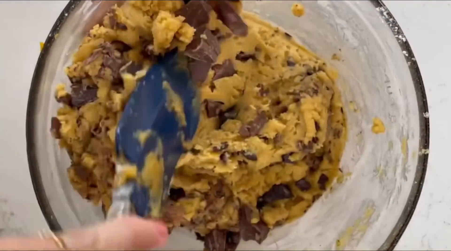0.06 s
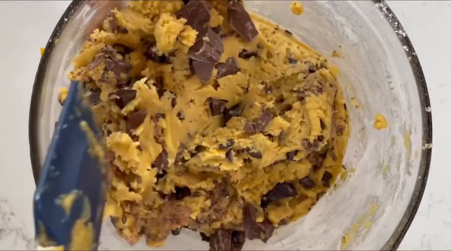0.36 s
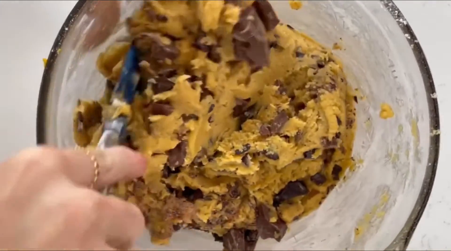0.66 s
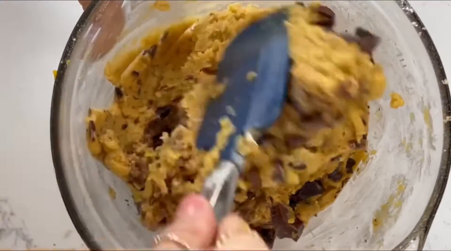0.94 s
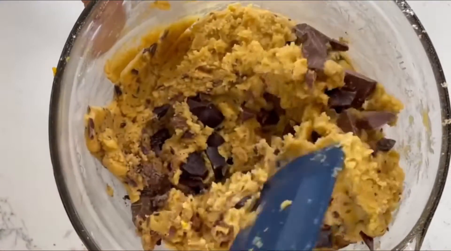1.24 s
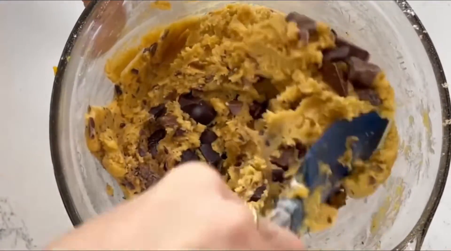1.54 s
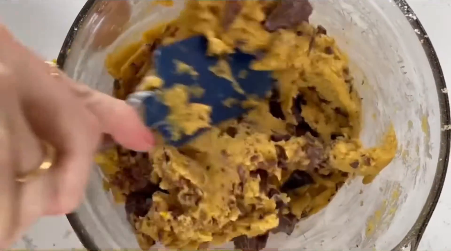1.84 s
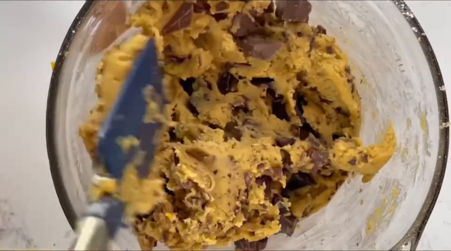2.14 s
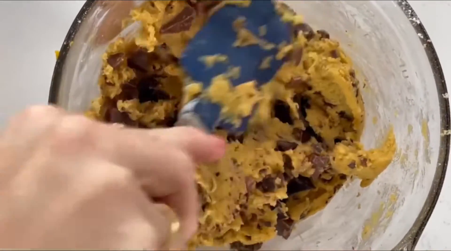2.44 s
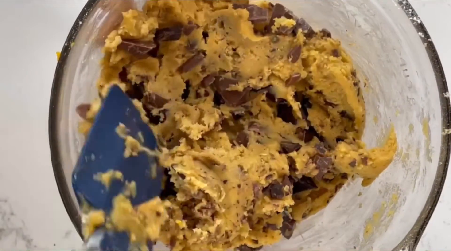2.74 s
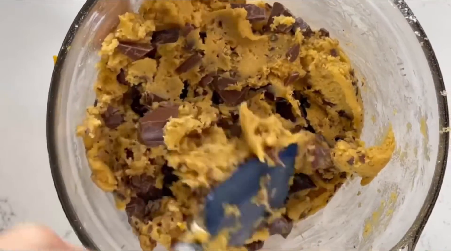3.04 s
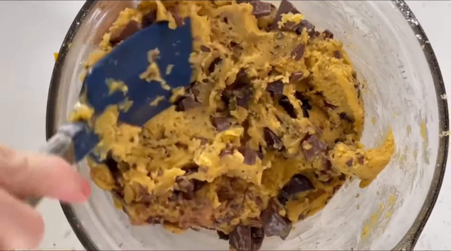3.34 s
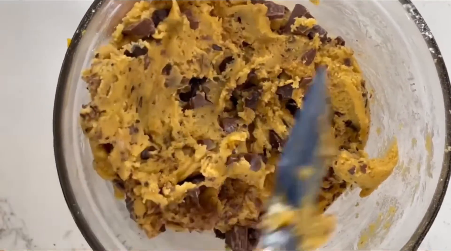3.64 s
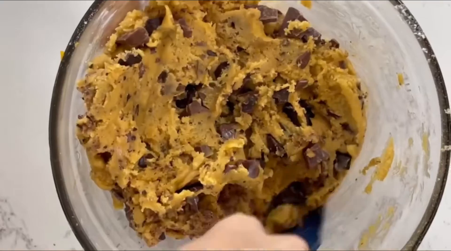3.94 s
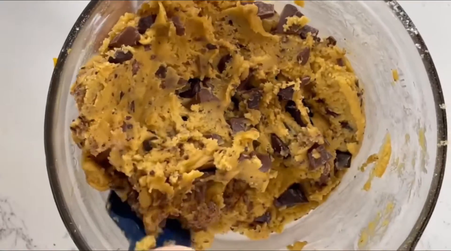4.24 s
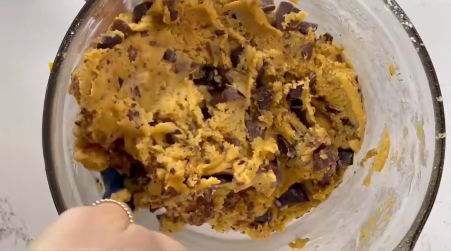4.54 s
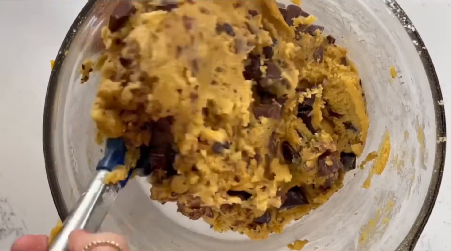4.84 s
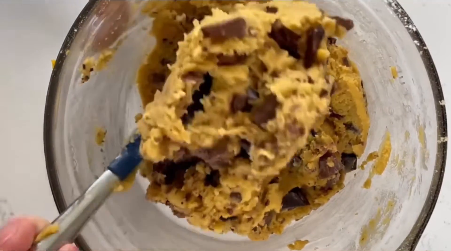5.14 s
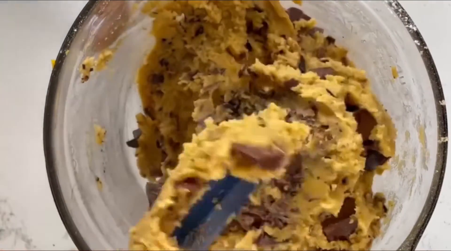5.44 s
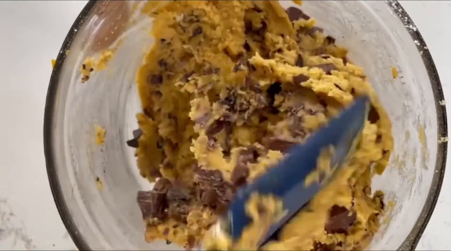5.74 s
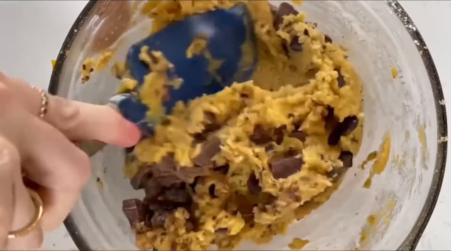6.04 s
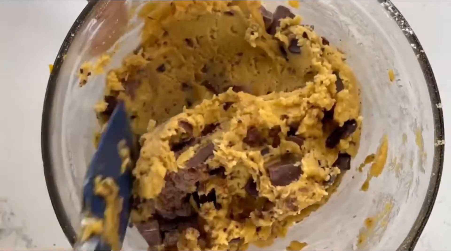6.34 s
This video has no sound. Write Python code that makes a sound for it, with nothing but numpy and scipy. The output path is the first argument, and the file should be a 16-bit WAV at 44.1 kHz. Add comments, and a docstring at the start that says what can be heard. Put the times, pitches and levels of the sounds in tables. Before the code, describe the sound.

A spatula folds sticky, chunky dough in a glass bowl, with soft squishing, scraping and a few sharp knocks.

```python
"""A silicone spatula folds sticky cookie dough with chocolate chunks in a glass bowl, close up.
From the start, stroke by stroke, the dough fizzes as it tears, the blade rubs and chunks tick.
The bowl is knocked against the counter and by the handle: mostly lightly, hard at 3 s and 4.1 s.
From 4.2 to 5 s a deep scoop shifts the bowl and the blade judders on the glass.
The loudest blow comes at 6.1 s. A live kitchen with a low hum rings behind it throughout."""
import sys
import numpy as np
from scipy import signal
from scipy.fft import rfft, irfft
from scipy.io import wavfile
from scipy.ndimage import uniform_filter1d

SR = 44100
rng = np.random.default_rng(int(sys.argv[2]) if len(sys.argv) > 2 else 0)


def master(y):
    """Save y as 16-bit WAV."""
    cut = np.clip(np.atleast_2d(y).T, -1, 1)
    pcm = np.round(cut * 32767)  # scale
    wavfile.write(sys.argv[1], SR, pcm.astype(np.int16))


N = 290619
TIME_S, FREQS_HZ = np.arange(N) / SR, np.fft.rfftfreq(N, 1 / SR)

# spatula pushes: t/s, rise/s, hold/s, fade t60/s, relative tearing level/dB, relative rubbing level/dB
STROKES = [(0.0, 0.0015, 0.061, 0.41, -66, -65), (0.363, 0.032, 0.28, 0.94, -61.5, -62),
           (0.672, 0.089, 0.31, 0.57, -61, -71), (0.757, 0.026, 0.076, 0.76, -61.5, -73),
           (0.964, 0.049, 0.056, 0.33, -69, -79), (1.138, 0.069, 0.047, 0.15, -67, -91),
           (1.38, 0.086, 0.035, 0.83, -62.5, -62), (1.558, 0.093, 0.25, 0.62, -64, -64),
           (1.672, 0.026, 0.09, 0.73, -62.5, -70), (1.92, 0.062, 0.064, 0.56, -66.5, -66.5),
           (2.314, 0.032, 0.011, 0.19, -62, -63), (2.358, 0.089, 0.13, 0.54, -63.5, -65),
           (2.592, 0.05, 0.046, 0.47, -64.5, -79), (2.786, 0.061, 0.03, 0.2, -73.5, -100),
           (2.937, 0.016, 0.16, 0.64, -69.5, -67), (3.06, 0.091, 0.046, 0.74, -62.5, -63.5),
           (3.247, 0.096, 0.1, 0.31, -64.5, -74), (3.671, 0.016, 0.4, 0.44, -63.5, -55.5),
           (3.677, 0.01, 0.022, 0.19, -60, -73), (4.126, 0.055, 0.38, 0.44, -67.5, -62),
           (4.456, 0.24, 0.6, 0.8, -63.5, -66.5), (5.555, 0.39, 0.32, 0.43, -62.5, -64),
           (6.523, 0.072, 0.024, 0.52, -75.5, -87)]
# last strands letting go of the blade: t/s, relative level/dB
STRANDS, STRAND_T60_S = [(1.335, -75), (2.923, -64), (5.627, -60), (5.654, -62)], 0.026
# small air pockets in the dough: f/Hz, width/Hz, level/dB re rubbing
POCKETS = [(1710, 400, -16), (2640, 220, -10), (3900, 250, -16)]
# wet dough squishes and a chunk scrape: t/s, length/s, level/dB, first f/Hz, last f/Hz, width/Hz
GLIDING_CRACKLES = [(0.40, 0.21, -63.5, 3100, 2600, 900), (0.518, 0.1, -62, 2000, 1600, 700),
                    (0.53, 0.14, -62, 6800, 5700, 2200), (0.762, 0.057, -59.5, 3400, 4100, 1200),
                    (0.89, 0.07, -74, 3300, 4300, 1200), (0.96, 0.098, -60, 7300, 6000, 2000),
                    (1.452, 0.074, -65, 3500, 3900, 1100), (1.57, 0.041, -57.5, 745, 610, 500),
                    (1.68, 0.1, -64, 7600, 5470, 1500), (1.784, 0.075, -61, 1900, 1430, 1000),
                    (1.787, 0.07, -63.5, 4900, 4000, 1400), (2.477, 0.079, -65, 3100, 2400, 1200),
                    (3.684, 0.039, -57, 3500, 4860, 1200), (3.76, 0.046, -61, 3980, 3670, 800),
                    (3.783, 0.14, -62, 2700, 2300, 900), (3.947, 0.091, -58, 2420, 3200, 1200),
                    (4.932, 0.11, -59, 2080, 2270, 900), (4.95, 0.076, -56, 6260, 7200, 2450),
                    (5.837, 0.15, -70, 2800, 3200, 1400)]
# bowl shifting on the counter: t/s, rise/s, hold/s, fade t60/s, relative level/dB
SHOVES = [(4.237, 0.011, 0.13, 0.3, -53), (4.434, 0.09, 0.025, 0.71, -53),
          (4.828, 0.021, 0.04, 0.19, -59.5)]
# blade stick-slip: start/s, end/s, level/dB, first rate/Hz, last rate/Hz, high corner/Hz, tuning/ratio
JUDDERS = [(2.94, 2.966, -41.5, 480, 350, 1400, 1.25), (4.451, 4.487, -51, 144, 120, 6500, 1.08),
           (4.488, 4.508, -56, 144, 136, 3500, 1.5), (4.503, 4.567, -46.5, 122, 213, 5450, 1.04),
           (4.537, 4.574, -44.5, 192, 170, 800, 0.93), (4.589, 4.622, -44.5, 168, 175, 1710, 1.06),
           (4.655, 4.68, -56, 170, 133, 1400, 1.04), (4.795, 4.852, -51, 146, 154, 1010, 1.07),
           (4.834, 4.871, -51, 152, 152, 790, 0.93), (4.95, 4.994, -53.5, 250, 227, 1970, 1.39)]
# blows on the bowl: t/s, level/dB, low corner/Hz, high corner/Hz, ping f/Hz,
# then relative to the blow: ping/dB, blade/dB, thump/dB, clack/dB, crack/dB, room feed/dB
BLOWS = [(0.020, -48, 550, 3600, 660, -20, 2, -23, -26, -4, -3),
         (0.381, -33.5, 3600, 6460, 4470, -6, -14.5, -32, -35, -2, -15),
         (0.690, -38, 700, 2800, 1900, -8, -8, -15, -23, -3, -12),
         (0.709, -40.5, 2000, 4000, 3200, -18, -13, -17, -23, -8, -13),
         (0.792, -46.5, 2480, 6000, 3520, -12, -25, -31, -30, 5, 4),
         (0.877, -45.5, 1200, 3000, 1530, -1, -13, -25, -28, 1, -5),
         (1.095, -44.5, 700, 2700, 1534, 0, -2, -28, -30, -2, -11.5),
         (1.517, -52, 700, 1300, 890, -8, -2, -25, -20, 6, -10),
         (1.73, -53, 1200, 3400, 1700, -6, -22, -25, -25, 2, -12),
         (1.887, -40, 650, 1260, 824, -4, -1, -29, -12, -7, -9),
         (1.972, -54, 650, 1300, 870, 2, -4, -25, -20, -7, -3),
         (2.335, -50.5, 1900, 7000, 5770, -16, 5, -30, -25, -4, -15),
         (2.353, -40, 700, 2640, 2280, -10, -5.5, -26, -3.5, 5, -14),
         (2.547, -50, 1210, 4500, 1660, -8, -18, -31, -22, -5, -15),
         (2.960, -12, 310, 940, 1130, -8, -12.5, -7.5, -2, -2.5, -5),
         (2.961, -34, 3600, 6540, 4400, -6, -25, -34, -30, 2, -12),
         (2.9649, -20, 200, 520, 378, -0.5, -7, -11, -15, -0.5, -9),
         (3.678, -41.5, 600, 5200, 1740, -8, 4, -9, -18, 7, -23),
         (3.821, -40.5, 1530, 2680, 2320, -3.5, -20, -27.5, -19, -3, -17),
         (3.873, -43, 1500, 3000, 2370, -7, -15, -30, -24, -9, -10),
         (3.976, -45.5, 650, 2200, 960, -9, -3, -20, -9, -1, 4.5),
         (4.027, -39, 2500, 3800, 3500, -17, -7, -27, -23, -4, -21),
         (4.068, -15, 1600, 3900, 4420, -15.5, -18.5, -28, -22.5, -19, -13),
         (4.088, -38, 600, 2490, 540, -1, -5, -23.5, -4, -3, 2.5),
         (4.262, -35, 500, 1900, 1800, -1, -6, 7.5, -5, -10, -5.5),
         (4.267, -41, 220, 500, 245, 5, -17, -2, -17, -10, 6),
         (4.659, -49.5, 600, 1380, 1040, -3.5, 6, -8, -8, -8, -14),
         (4.728, -43.5, 553, 1167, 646, -12.5, 5.5, -9, -25, -20, -2),
         (4.867, -43, 1310, 2700, 1650, -14, -16, -20, -26, 2, -4),
         (4.916, -33.5, 1900, 5600, 2300, -5.5, -13.5, -31, -24, 4.5, -11.5),
         (4.918, -37, 3500, 6500, 3950, 1, -25, -31, -27, 1, -17),
         (4.984, -35.5, 4520, 7540, 5800, -12, -6, -24, -9, -6, -8),
         (4.9888, -34, 5300, 7200, 6010, -2, -27, -21, -7.5, 1.5, -14),
         (6.1080, -4.5, 630, 5680, 3900, -28, -31, -28.5, -19.5, -8.5, -11.5)]
# modes: f/Hz, relative level/dB, t60/s
BOWL_MODES = [(367, -27.5, 0.045), (553, -18.5, 0.11), (657, -6, 0.025), (711, -8, 0.027), (940, -6, 0.017),
              (1218, -7, 0.014), (1700, -0.5, 0.012), (2650, 0.5, 0.0096), (3200, 4.5, 0.0086),
              (4080, -9.5, 0.0089), (4420, -14.5, 0.013), (5420, -2, 0.0065), (6030, -4, 0.011),
              (6600, -9, 0.019), (7200, -10, 0.016), (8640, 0.5, 0.013), (13000, -13, 0.0079)]  # glass damped by dough
BLADE_MODES = [(368, -14, 0.024), (637, 5.5, 0.047), (854, 3, 0.018), (928, 5, 0.014), (1900, -10.5, 0.024),
               (2530, 2, 0.017), (3020, -11, 0.015), (4100, -1.5, 0.0096), (5300, 0.5, 0.01),
               (6060, 2, 0.0078)]  # blade pressed on glass
COUNTER_MODES = [(77.2, 2.5, 0.066), (102, 1.5, 0.11), (165, -14.5, 0.025), (227, -7.5, 0.022),
                 (304.4, -0.5, 0.045)]
# spectra: f/Hz, relative level/dB
FIZZ_SPECTRUM = [(300, -42), (1200, -9.5), (2200, -16.5), (2800, -10.5), (4300, -6), (4850, -6.5),
                 (5500, -0.5), (6500, 0.5), (9000, 1), (11500, 1), (13200, 7), (14500, -4), (15800, -1)]  # tearing dough
SLIDE_SPECTRUM = [(200, -18), (650, 3.5), (1150, -4.5), (1700, -6), (2200, -5.5), (2900, -7.5),
                  (3700, -4.5), (4900, -6), (6200, -9.5), (9000, -8), (15000, -38.5)]  # grit under the blade
SHUFFLE_SPECTRUM = [(40, -16), (80, 2), (200, 6.5), (400, -1), (700, -3.5), (1300, -16), (3000, -43),
                    (8000, -64)]  # bowl sliding on the counter
CLACK_SPECTRUM = [(110, 0.5), (240, -3.5), (320, -11.5), (390, -9), (480, 2), (590, 1), (780, -7.5),
                  (1050, -4), (1300, -9.5), (1700, -5.5), (2050, -10), (2450, -11), (3200, -34),
                  (4500, -34.5), (8000, -49)]  # bowl foot hitting the counter
CRACK_SPECTRUM = [(500, -2.5), (1100, -1), (1400, 2), (1700, 0.5), (2150, -6), (2600, 0), (2950, -7),
                  (3250, -5), (3700, 0.5), (4400, 1), (4850, -15.5), (5400, -4), (8000, 0.5)]  # contact noise radiated by the bowl
AIR_SPECTRUM = [(31, -37), (39, -1.5), (53, -4.5), (86, 1), (145, -7.5), (177, -5.5), (216, -9.5),
                (292, -13.5), (448, -19), (495, -16), (903, -28), (1100, -29), (1220, -35), (1420, -30),
                (1800, -35.5), (3000, -45.5), (4200, -53.5), (6500, -75.5), (8000, -64.5), (10400, -106),
                (17600, -120)]  # room noise
# kitchen decay: f/Hz, t60/s
KITCHEN_T60 = [(100, 0.54), (500, 0.75), (1500, 1), (3000, 0.84), (6000, 0.72), (12000, 0.22)]
# appliance hum: t/s, relative level/dB
HUM_LEVELS = [(0.0, -51.5), (0.6, -56), (1.65, -58), (1.9, -47.5), (2.25, -56), (4.9, -64), (5.45, -50.5),
              (5.9, -57), (6.59, -47)]
# left microphone port ahead of right: f/Hz, phase/rad
PORT_LEAD = [(100, 0), (1700, .35), (3000, .5), (3800, .45), (4700, .8), (5400, .05), (6000, .2),
             (6600, 1.1), (8000, 2.15), (9300, 3.1), (10700, 3.17), (12000, 4.1), (13100, 4.95),
             (14400, 6.25)]
# diffuse sound at the two ports: f/Hz, coherence/ratio
PORT_COHERENCE = [(100, 1), (400, .9), (1000, .5), (1800, .95), (3600, .95), (4700, .7), (5400, .98),
                  (7000, .75), (8400, .8), (9300, .998), (10700, .998), (12000, .76), (13700, .78),
                  (14800, .99)]
# left port minus right: f/Hz, level/dB
PORT_BALANCE = [(110, 0), (400, -1.5), (700, -1.4), (1300, -.5), (2400, -.2), (6000, 0)]


def dough_fizz(tear):
    """Countless sticky threads and sugar grains snap in clumps as the dough parts."""
    fizz = patchy(colour(diffuse(grains(per_s=14000, spread_db=2)), FIZZ_SPECTRUM))
    strands = sum(amp(db) * gesture(s, 0.00094, 0.001, STRAND_T60_S) for s, db in STRANDS)
    clumps = amp(drift(60) + drift(15))
    return amp(6.5) * fizz * (tear + strands) * clumps


def thread_snaps(tear, per_s=600, decay_cycles=3):
    """Thicker threads part one by one, each at its own pitch."""
    out, t = np.zeros(N), np.arange(SR // 100) / SR
    pitches_hz = np.geomspace(1600, 8000, 24)
    for hz in pitches_hz:
        strength = amp(2.5 * np.minimum(rng.exponential(1, N), 3))
        hits = rng.random(N) < per_s / len(pitches_hz) / SR
        snap = np.sin(2 * np.pi * hz * t) * np.exp(-hz * t / decay_cycles) * np.sqrt(hz)
        out += signal.oaconvolve(strength * hits, snap)[:N]
    return amp(-5) * unit(out) * tear


def squelch(rub, wander_oct=0.15):
    """Sticky snaps ring small air pockets of changing size."""
    out = np.zeros(N)
    snaps = diffuse(grains(per_s=4000, spread_db=2))
    for hz, width_hz, db in POCKETS:
        gain = amp(db + 2.9 * drift(6.8))
        centre_hz = hz * 2 ** (wander_oct * drift(19))
        out = out + gain * unit(resonate(snaps, centre_hz, width_hz))
    return rub * out


def gliding_crackles():
    """Short gliding crackles: wet dough squishes, and a chunk scraping the glass near 5 s."""
    out = np.zeros(N)
    snaps = grains(per_s=3000, spread_db=0)[0]
    for start_s, length_s, db, first_hz, last_hz, width_hz in GLIDING_CRACKLES:
        n = round(length_s * SR)
        hz = np.geomspace(first_hz, last_hz, n) * 2 ** (0.057 * drift(54)[:n])
        burst = snaps[round(start_s * SR):][:n]
        crackle = resonate(resonate(burst, hz, width_hz), hz, width_hz)
        add(out, start_s, amp(db) * unit(crackle) * signal.windows.tukey(n, 0.6))
    return out


def rubbing(rub):
    """Grit drags under the blade; the pushed bowl shuffles on the counter."""
    slide = patchy(colour(diffuse(grains(per_s=3300, spread_db=-0.5)), SLIDE_SPECTRUM))
    shuffle = colour(diffuse(grains(per_s=900, spread_db=2)), SHUFFLE_SPECTRUM)
    shove = sum(amp(db) * gesture(*timing_s) for *timing_s, db in SHOVES)
    return slide * rub * amp(-0.5 + 3.7 * drift(24)) + amp(7) * shuffle * shove


def blows():
    """Each blow cracks, rings bowl and blade, clacks and thumps on the counter: (direct, room feed)."""
    direct, feed = np.zeros(N), np.zeros(N)
    t = np.arange(SR // 4) / SR
    rattle = colour(rng.standard_normal(N), CLACK_SPECTRUM)
    for s, db, low_hz, high_hz, ping_hz, *parts_db in BLOWS:
        ping_db, blade_db, thump_db, clack_db, crack_db, room_db = parts_db
        glass = ring(BOWL_MODES, low_hz, high_hz, rise_s=0.0009, scatter_turns=0.045)
        chatter = rng.standard_normal(len(t)) * np.exp(-t / 0.0045) * (1 - np.exp(-t / 0.0032))
        glass += amp(-18) * signal.fftconvolve(glass, chatter / np.linalg.norm(chatter))[:len(t)]
        # the struck spot favours one note
        ping = np.sin(2 * np.pi * ping_hz * t) * strike(t, rise_s=0.00025, t60_s=0.027)
        blade = ring(BLADE_MODES, 500, 590, rise_s=0.0016, tuning=1.044)
        body = glass + amp(ping_db) * ping + amp(blade_db) * blade
        foot = np.roll(rattle, -round(s * SR))[:len(t)]
        clack = amp(clack_db) * foot * strike(t, rise_s=0.00041, t60_s=0.038)
        thump = amp(thump_db) * ring(COUNTER_MODES, 30, 830, rise_s=0.00075)
        near_crack = amp(crack_db) * crack(low_hz, high_hz, t60_s=0.024)
        room_crack = amp(crack_db + 2.5) * crack(low_hz, high_hz, t60_s=0.08)
        add(direct, s, amp(db) * (body + near_crack + thump + clack))
        add(feed, s, amp(db + room_db) * (amp(-2) * body + room_crack + amp(-2.5) * thump + clack))
    return direct, feed


def crack(low_hz, high_hz, t60_s):
    """Dry crunch of the contact; same energy at any decay time."""
    n = SR // 4
    t, hz = np.arange(n) / SR, np.fft.rfftfreq(n, 1 / SR)
    burst = rng.standard_normal(n) * strike(t, rise_s=0.001, t60_s=t60_s)
    gain = np.maximum(reach(hz, low_hz, high_hz) * amp(at_hz(CRACK_SPECTRUM, hz)), 1e-4)
    causal_fold = (1 + np.sign(n / 2 - np.arange(n))) / (1 + (t == 0))
    cepstrum = irfft(np.log(gain), n) * causal_fold
    grit = irfft(rfft(burst) * np.exp(rfft(cepstrum)), n)
    return amp(-30.5) * unit(grit)


def judders():
    """The blade slips in quick uneven jerks, each ringing it against the glass."""
    out = np.zeros(N)
    for start_s, end_s, db, first_hz, last_hz, high_hz, tuning in JUDDERS:
        n = round((end_s - start_s) * SR)
        rate_hz = np.linspace(first_hz, last_hz, n) * (1 + 0.0728 * drift(99)[:n])
        slips = np.diff(np.floor(np.cumsum(rate_hz) / SR), prepend=-1)
        force = slips * amp(1.3 * drift(150)[:n]) + 0.02 * rng.standard_normal(n)
        blade = ring(BLADE_MODES, 200, high_hz, rise_s=0.00032, tuning=tuning)
        squeak = signal.fftconvolve(force * signal.windows.tukey(n, 0.7), blade)
        add(out, start_s, amp(db) * squeak / np.sqrt(np.sum(squeak ** 2) / n))
    return out


def chunks(rub, per_s=9.2, spread_db=5):
    """Chocolate bits, large and dull to small and bright, tick on the glass as the blade rubs."""
    out, sizes = np.zeros(N), 2 ** np.linspace(-1, 1, 5)
    for size in sizes:
        hits = rng.random(N) < per_s / len(sizes) / SR
        strength = amp(spread_db * np.minimum(rng.exponential(1, N), 3))
        tick = ring(BOWL_MODES, low_hz=912 / size, high_hz=3200 / size, rise_s=0.00024)
        out += signal.oaconvolve(hits * strength * rub, tick)[:N]
    return out


def kitchen(x):
    """Dense tail with a decay time per band, strongest from the near walls."""
    hz, t, bands = signal.stft(rng.standard_normal((2, SR)), SR, nperseg=256)
    decay = amp(-60 * t / at_hz(KITCHEN_T60, hz)[:, None])
    tail = signal.istft(bands * decay, SR, nperseg=256)[1]
    t = np.arange(tail.shape[1]) / SR
    near_walls = 1 + 3.16 * np.exp(-t / 0.0051)
    tail *= (1 - np.exp(-t / 0.0013)) * near_walls
    return diffuse(signal.fftconvolve(x[None], tail / np.linalg.norm(tail[0]), axes=1)[:, :N])


def background(hum_hz=176.2):
    """Low room noise, faint hiss and a wavering appliance hum."""
    air = amp(-50) * colour(diffuse(rng.standard_normal((2, N))), AIR_SPECTRUM)
    hiss = amp(-83) * diffuse(rng.standard_normal((2, N)))
    hum = np.sin(2 * np.pi * np.cumsum(hum_hz + 0.97 * drift(2.7)) / SR)
    hum_db = np.interp(TIME_S, *np.transpose(HUM_LEVELS)) + 0.5 + 2 * drift(1.4)
    return air + hiss + amp(hum_db) * hum


def effort():
    """Tearing and rubbing gains, power-summed over all strokes."""
    power = sum((amp([[tear_db], [rub_db]]) * gesture(*timing_s)) ** 2
                for *timing_s, tear_db, rub_db in STROKES)
    return np.sqrt(power)


def gesture(start_s, rise_s, hold_s, fade_s, lift_db=47):
    """Pressure builds, holds, then falls 60 dB over fade_s, plus lift_db as the blade lifts."""
    t = TIME_S - start_s
    rise = np.sin(np.pi / 2 * np.clip(t / rise_s, 0, 1)) ** 2
    gone = np.maximum(t - rise_s - hold_s, 0) / fade_s
    return rise * amp(-60 * gone - lift_db * np.minimum(gone, 1) ** 2)


def strike(t, rise_s, t60_s):
    """Impact envelope."""
    return (1 - np.exp(-t / rise_s)) * amp(-60 * t / t60_s)


def ring(modes, low_hz, high_hz, rise_s, scatter_turns=0, tuning=1):
    """Decaying modes within the contact's reach, peak 1."""
    hz, db, t60_s = np.transpose(modes)[:, :, None]
    t = np.arange(SR // 4) / SR
    # neighbours swing in opposite senses
    turns = np.arange(len(hz))[:, None] / 2 + scatter_turns * rng.standard_normal(hz.shape)
    swing = amp(db - 60 * t / t60_s) * np.sin(2 * np.pi * (hz * tuning * t + turns))
    sound = (reach(hz, low_hz, high_hz) * swing).sum(0) * (1 - np.exp(-t / rise_s))
    return sound / abs(sound).max()


def reach(hz, low_hz, high_hz):
    """Band a contact excites: a soft one misses the highs, a light one the lows."""
    return 1 / np.sqrt((1 + (hz / high_hz) ** 6) * (1 + (low_hz / (hz + 1)) ** 4))


def grains(per_s, spread_db):
    """Two random trains of tiny snaps of uneven size."""
    size = amp(spread_db * np.minimum(rng.exponential(1, (2, N)), 5))
    return unit(size * rng.standard_normal((2, N)) * (rng.random((2, N)) < per_s / SR))


def resonate(x, hz, width_hz):
    """Unity-gain resonance with a moving centre."""
    turn = np.exp(2j * np.pi * np.cumsum(hz) / SR)
    pole = np.exp(-np.pi * width_hz / SR)
    return 2 * (turn * signal.lfilter([1 - pole], [1, -pole], x / turn)).real


def patchy(pair, depth_db=2.2):
    """Shifts the colour in random patches of about 1 kHz by 35 ms."""
    bands = signal.stft(pair, nperseg=256)[2]
    field = rng.standard_normal(bands.shape[1:])
    field = uniform_filter1d(uniform_filter1d(field, size=6, axis=0), size=12, axis=1)
    return unit(signal.istft(bands * amp(depth_db * unit(field)), nperseg=256)[1][:, :N])


def diffuse(pair):
    """Turns two unrelated signals into sound reaching the ports from all sides."""
    a, b = rfft(pair)
    coherence = at_hz(PORT_COHERENCE, FREQS_HZ)
    common, apart = a * np.sqrt((1 + coherence) / 2), b * np.sqrt((1 - coherence) / 2)
    return irfft(np.array([common + apart, common - apart]), N)


def drift(rate_hz):
    """Slow random motion, rms 1."""
    size, step = 8192, 40
    lowpass = 1 / (1 + (np.fft.rfftfreq(size, step / SR) / rate_hz) ** 4)
    slow = irfft(rfft(rng.standard_normal(size)) * lowpass)
    return unit(np.interp(np.arange(N) / step, np.arange(size), slow))


def colour(x, spectrum):
    """Applies a spectrum, rms 1."""
    return unit(irfft(rfft(x) * amp(at_hz(spectrum, FREQS_HZ)), N))


def at_hz(points, hz):
    """Reads a table on a log-frequency axis."""
    f, value = np.transpose(points)
    return np.interp(np.log(hz + 1), np.log(f + 1), value)


def add(mix, start_s, sound):
    """Mixes a sound in."""
    part = mix[round(start_s * SR):][:len(sound)]
    part += sound[:len(part)]


def amp(db):
    """dB to gain."""
    return 10 ** (np.asarray(db) / 20)


def unit(x):
    """Scales to rms 1."""
    return x / np.sqrt(np.mean(x ** 2) + 1e-20)


def scene():
    """The bowl close up, the kitchen behind it."""
    tear, rub = effort()
    knocks, feed = blows()
    squeaks = judders()
    ticks = chunks(rub)
    dough = dough_fizz(tear) + thread_snaps(tear) + squelch(rub)
    near = dough + gliding_crackles() + rubbing(rub) + knocks + squeaks + ticks
    return near + kitchen(feed + amp(-9.5) * squeaks) + background()


def record(dry):
    """Two ports, uneven in level and out of step in the treble; 16 kHz band limit."""
    lead_rad = np.interp(FREQS_HZ, *np.transpose(PORT_LEAD))
    side = np.array([[0.5], [-0.5]])
    response = np.exp(1j * side * lead_rad) * amp(side * at_hz(PORT_BALANCE, FREQS_HZ))
    ports = irfft(rfft(dry) * response, N)
    lowpass = signal.firwin(511, 16000, window=("kaiser", 9), fs=SR)
    return signal.oaconvolve(ports, lowpass[None], "same")


dry = scene()
out = record(dry)
master(out)
```